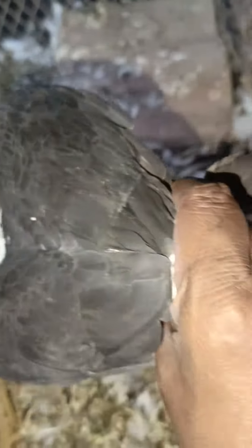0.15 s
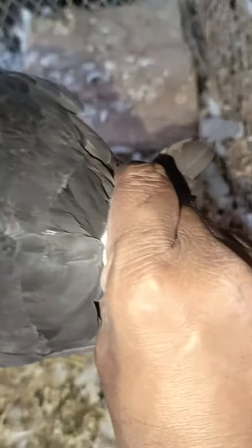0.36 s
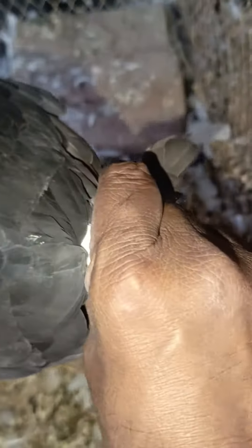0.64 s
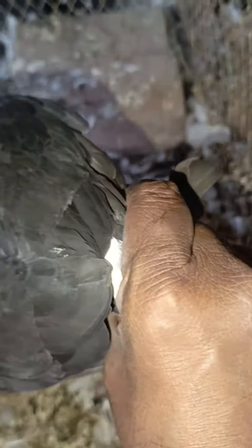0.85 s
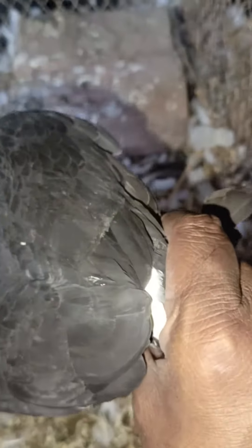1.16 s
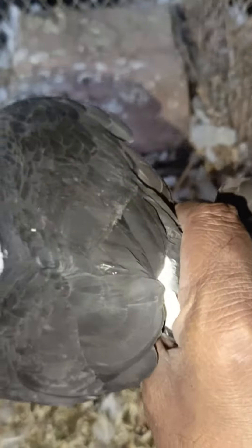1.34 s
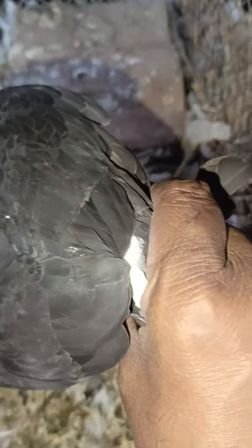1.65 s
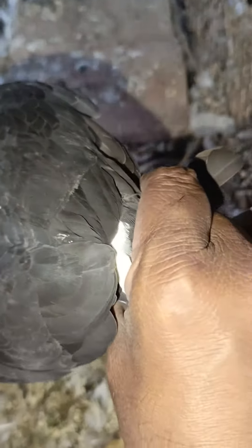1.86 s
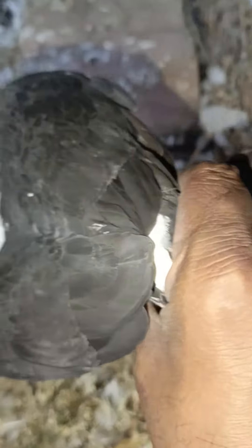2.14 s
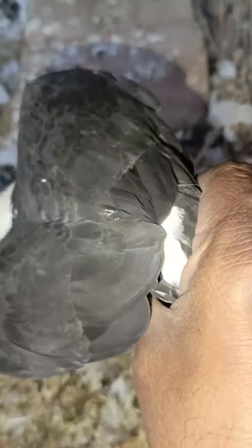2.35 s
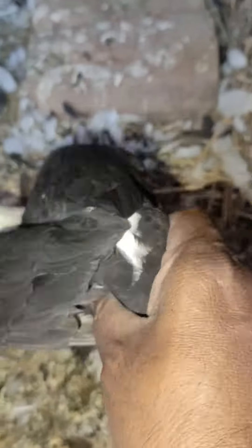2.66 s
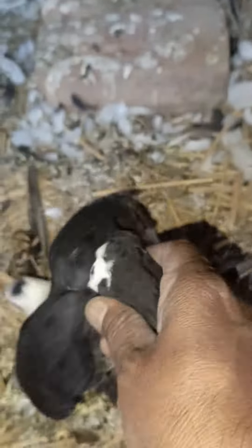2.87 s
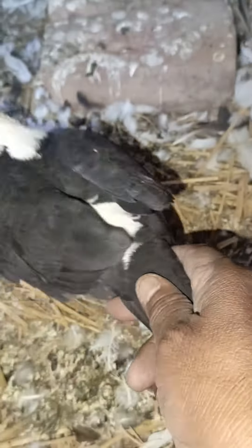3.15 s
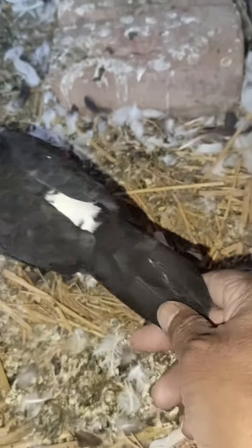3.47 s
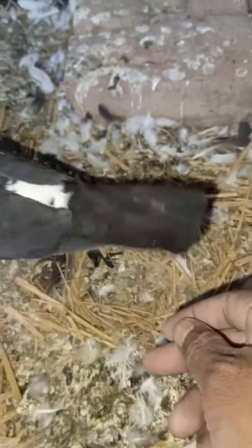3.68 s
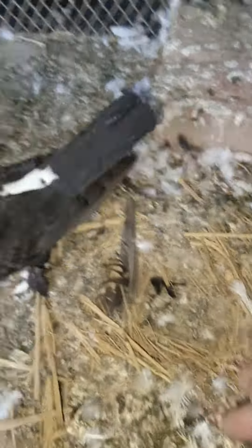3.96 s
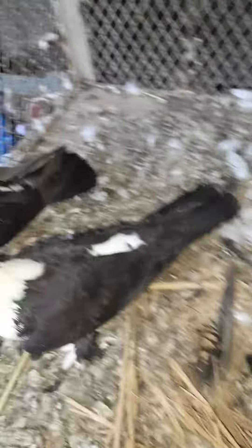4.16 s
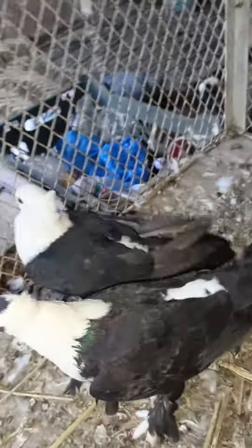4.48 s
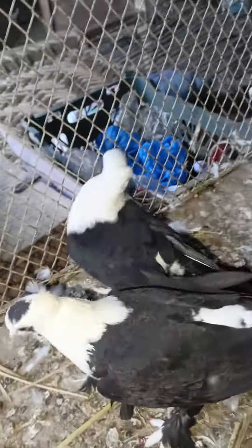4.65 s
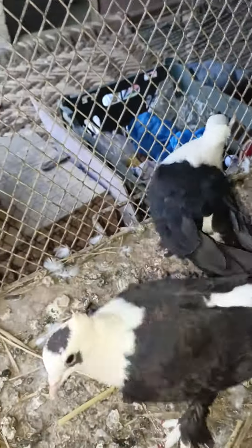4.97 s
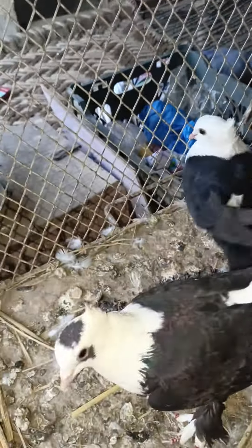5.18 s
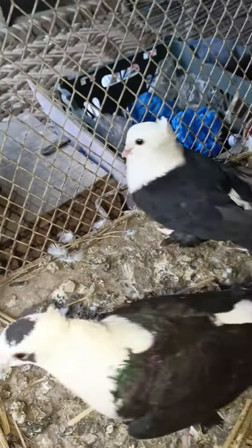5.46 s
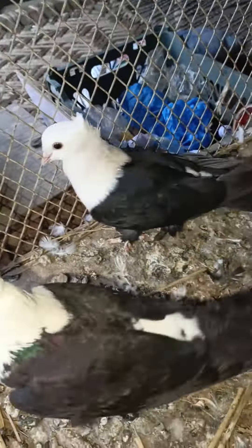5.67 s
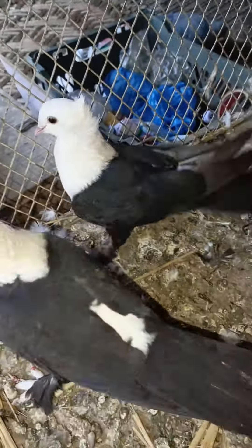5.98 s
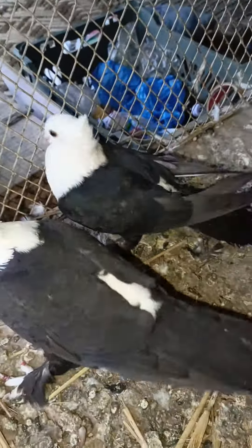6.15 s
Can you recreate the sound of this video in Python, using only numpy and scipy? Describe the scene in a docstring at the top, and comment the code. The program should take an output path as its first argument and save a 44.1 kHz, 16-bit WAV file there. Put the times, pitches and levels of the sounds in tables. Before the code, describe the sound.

Close pigeons in a wire cage: raspy high squeaks come in clusters among low murmuring coos, gritty rustling, sharp clicks and a dull background wash.

```python
"""Wire cage under a shed roof: pigeons close to a phone. Young birds squeak and whistle in hoarse bursts
(shaky harmonic stacks plus air), adults coo (noise through moving resonances), feet and feathers scuffle in
straw and grit (clumped crackles), claws tick and knock (short noise decays). The shed adds a short tail;
a dull wash of far flock, air and street and low draughts on the phone lie underneath."""
import sys
import numpy as np
from scipy import signal
from scipy.fft import rfft, irfft
from scipy.io import wavfile
from scipy.ndimage import uniform_filter1d

SR = 44100
rng = np.random.default_rng(int(sys.argv[2]) if len(sys.argv) > 2 else 0)


def file_out(sig):
    """Save sig as 16-bit WAV at sys.argv[1]."""
    # one column per channel
    cols = np.atleast_2d(sig).T
    # limit, then scale
    lim = np.clip(cols, -1, 1)
    pcm = np.round(lim * 32767).astype(np.int16)
    wavfile.write(sys.argv[1], SR, pcm)


def volts_from_db(level):
    """Convert decibel levels to linear amplitude ratios."""
    exponent = np.asarray(level, float) / 20
    return 10 ** exponent


N = 278712

# Adults cooing over each other. Each row: start in seconds, length in seconds, pitch in Hz, level in dB before the fades.
COOS = [(0, 0.1296, 457.2, -28.5), (.04, 0.2474, 306.9, -34.5), (.38, 0.239, 282.7, -43),
        (.5, 0.335, 448.6, -41.5), (.72, 0.37, 331.5, -33.5), (.79, 0.1548, 661.2, -35),
        (1, 0.3955, 358.8, -33), (1.14, 0.1515, 482, -38.5), (1.35, 0.349, 297.7, -34.5),
        (1.46, 0.38, 423.7, -40.5), (1.85, 0.536, 354.2, -38.5), (2.46, 0.416, 356.2, -29),
        (2.89, 0.1933, 448.4, -31), (3.03, 0.206, 355.8, -29.5), (3.58, 0.458, 315.1, -37),
        (3.85, 0.433, 260.2, -34), (3.99, 0.226, 453, -34), (4.25, 0.199, 405, -40),
        (4.44, 0.284, 286.3, -39), (4.78, 0.28, 311.2, -33.5), (5.2, 0.397, 352.4, -35),
        (5.34, 0.342, 261.9, -39.5), (5.64, 0.431, 343.4, -32.5), (5.73, .3, 406.7, -35.5)]
# Bouts of straw, grit and feathers. Each row: start in seconds, length in seconds, start level in dB, end level in dB,
# both before the common SCUFFLE_GAIN_DB.
SCUFFLES = [(0, .22, -48, -42.5), (.22, .12, -45, -64), (.37, .05, -58, -43), (.8, .25, -45, -38),
            (1.05, .26, -54, -68), (1.315, .1, -43, -52), (1.41, .27, -50, -43), (1.68, .12, -44, -54),
            (1.8, .08, -52, -40), (1.88, .4, -45, -54), (2.31, .08, -55, -46), (2.39, .06, -48, -66),
            (2.55, .39, -61, -47), (2.94, .1, -54, -68), (3.72, .15, -57, -62), (4.16, .26, -46, -54),
            (4.44, .3, -46, -52), (4.75, .55, -57, -63), (5.35, .4, -48, -62), (5.755, .2, -48, -56),
            (5.95, .37, -55, -60)]
SCUFFLE_GAIN_DB = 10
# Spectrum of straw and grit. Each row: frequency in Hz, relative density in dB per Hz.
STRAW_SPECTRUM = [(290, -52), (500, 0), (783, -5.5), (1190, -13.5), (1500, -7.5), (2290, 2), (4020, -6),
                  (4510, -5), (11900, -16.5), (14800, -10), (15900, -27)]
# Spectrum of far flock, air and street. Each row: frequency in Hz, relative density in dB per Hz.
YARD_SPECTRUM = [(24, -68.5), (40, -66.5), (123, -7), (320, 1.5), (454, -2), (788, -15.5), (1440, -17),
                 (2430, -14.5), (4780, -28), (11500, -47), (13700, -108.5), (14700, -43.5), (15900, -46)]
YARD_DB = -37.5
# How busily the far flock stirs, above the bass only. Each row: time in seconds, lift in dB.
STIR = [(0, -1), (1.05, 8.5), (1.22, -8), (1.35, 5.5), (2.1, 7.5), (2.3, -4.5), (2.95, 8.5), (3.1, -2.5),
        (3.65, -6.5), (4.3, -3.5), (4.9, -6), (5.2, -7), (5.9, 0.5), (6.32, -1)]
# Wing draughts and handling on the phone. Each row: start in seconds, length in seconds, crest level in dB.
BUFFETS = [(0, .3, -27), (.36, .32, -33), (1.28, .14, -40), (1.46, .38, -32), (2.05, .2, -45),
           (2.62, .25, -46), (4.9, .36, -34), (5.55, .6, -35)]
DRAUGHT_DB = -61  # the air is never quite still
# Spectrum of the draughts. Each row: frequency in Hz, relative level in dB.
DRAUGHT_SPECTRUM = [(20, 11), (70, 1.5), (130, -6), (250, -47.5)]
# Decay of the shed. Each row: frequency in Hz, time to fall 60 dB in seconds.
SHED_DECAY = [(300, 0.133), (2000, 0.434), (5000, 0.2427), (10000, 0.2047)]
# Claws and beaks on grit and brick. Each row: start in seconds, initial crack level in dB, knock relative to crack in dB.
TICKS = [(0.0338, -22, -8.5), (0.1192, -21.5, -4.5), (0.191, -15, -8.5), (0.2782, -23.5, -4),
         (0.3506, -27.5, -4.5), (0.5396, -13, -27.5), (0.5706, -16, -7.5), (1.3284, -22, -9.5),
         (1.6348, -14.5, -6), (1.706, -20, -5), (1.8322, -35, -2.5), (2.5469, -32, -22),
         (2.5687, -27.5, -10), (2.606, -24.5, -14), (2.6537, -27, -6.5), (2.9118, -13, -41.5),
         (3.132, -34.5, 4.5), (5.0178, -31.5, -44), (5.1268, -33.5, -47.5), (5.3874, -30, -31.5),
         (5.6037, -27, -10), (5.6172, -41, -29), (5.6746, -35, -8.5)]
# Spectrum of the knock. Each row: frequency in Hz, relative level in dB.
KNOCK_SPECTRUM = [(80, -63.5), (200, 2.5), (500, -7), (1200, 8), (2500, -39), (6000, -59.5)]
# Throat and beak response. Each row: frequency in Hz, relative level in dB.
BEAK = [(410, -59), (700, -59.5), (885, -18), (1160, -12), (1860, -18.5), (3480, -3.5), (4020, -5.5),
        (4820, 0), (5420, -10.5), (6510, -13), (10700, -28), (15800, -42)]
# Held squeaks. Each row: voice, start in seconds, length in seconds, pitch in Hz, strongest harmonic in dB
# (before contour and break-up), hoarseness 0-1.
SQUEAKS = [ ("reedy", .11, .14, 1560, -35, .5), ("nasal", .4, .13, 1450, -26.5, .2),
           ("clear", .44, .155, 1088, -23.5, .066), ("reedy", .615, .115, 1460, -27, .6),
           ("near", .625, .11, 1140, -24, .29), ("near", .7, .17, 1175, -12, .29),
           ("reedy", .885, .16, 1470, -26, .6), ("near", .9, .15, 1150, -26, .45),
           ("near", 1.873, .15, 1145, -16, .32), ("near", 2.035, .18, 1185, -15.5, .39),
           ("far", 2.71, .14, 2250, -34.5, .75), ("thin", 2.85, .09, 3290, -25, .43),
           ("reedy", 3.15, .14, 1190, -39, .62), ("near", 3.27, .15, 1160, -11, .32),
           ("near", 3.425, .165, 1185, -9, .3), ("far", 3.722, .1, 1930, -40, .45),
           ("low", 3.882, .15, 845, -26.5, .36), ("low", 4.055, .115, 850, -25.5, .36),
           ("reedy", 4.155, .16, 1490, -21, .45), ("near", 4.43, .075, 1150, -25, .34),
           ("reedy", 4.437, .18, 1480, -26, .48), ("sharp", 4.615, .032, 1430, -17, .49),
           ("sharp", 4.665, .04, 1340, -23, .53), ("piping", 4.7, .045, 1830, -36, .45),
           ("piping", 5.04, .07, 1520, -44, .48), ("thin", 5.139, .095, 3540, -33, .4),
           ("piping", 5.33, .19, 1890, -34.5, .3), ("near", 5.746, .18, 1145, -30, .42), ]
# Young birds' voices. Each row: breath in dB, odd harmonics in dB, tilt in dB per octave, scoop as a share of pitch
# (negative starts high), sag as a share of pitch (negative rises), swell in seconds, swell start in dB, fade in dB.
VOICES = { "near": (-5, -2.5, 1, .05, -.03, .04, -8, -24), "clear": (-11, -2, 3.5, -.025, 0, .06, -5, -8),
          "reedy": (-5, -11, .5, .2, .05, .035, -7, -13), "nasal": (-10, -15, 4, .01, .07, .02, -2, -14),
          "sharp": (-10, -5, -2.5, .05, .06, .012, -3, -6), "far": (-7.5, 14, -9, .03, -.02, .06, -4, -2),
          "piping": (-16, 15, -3, .07, .01, .03, -10, -5), "low": (-9.5, -3, -9, .03, .02, .035, -4, -9),
          "thin": (-12, -2, 6.5, .08, -.01, .015, -1, -20), }
SCOOP_S = .015  # time constant of finding the pitch
# Effort in dB above EASY_DB adds tilt; positive effort also thins the breath.
EASY_DB, BRIGHTEN_DB_PER_OCTAVE_PER_DB, CLEAR_UP_DB_PER_DB = -20, .3, .6
# Hard near squeaks bring in the other side of the syrinx, dropping from a high start to a held note.
HARD_DB = -19
SHRILL_LATE_S, SHRILL_S, SHRILL_DROP_S = .018, .072, .012
SHRILL_START_HZ, SHRILL_HZ = 3850, 3260
SHRILL_DB, SHRILL_FADE_DB = -17, -18
# Shrill voice. Its one row: hoarseness 0-1, breath in dB, odd harmonics in dB, tilt in dB per octave.
SHRILL_VOICE = (.35, -6, 0, 9)
# Sliding whistles. Each row: manner, start in seconds, length in seconds, top pitch in Hz, end pitch in Hz,
# strongest harmonic in dB (before contour and break-up).
WHISTLES = [ ("drop", 1.12, .06, 3410, 2300, -36), ("wail", 2.14, .135, 2680, 1420, -23.5),
            ("hook", 2.805, .045, 2750, 2570, -28), ("swell", 3.1, .18, 3050, 2560, -49),
            ("arch", 3.915, .15, 1240, 870, -14.5), ("climb", 4.2, .085, 1290, 1280, -22),
            ("wail", 4.295, .055, 2850, 2200, -24), ("wail", 4.51, .048, 2750, 2050, -30),
            ("hook", 4.634, .042, 3440, 2750, -20), ("drop", 4.74, .11, 3500, 1580, -35),
            ("drop", 5.137, .07, 4900, 2050, -31), ]
# Whistle manners. Each row: hoarseness 0-1, breath in dB, odd harmonics in dB, tilt in dB per octave,
# scoop as a share of pitch, share of time rising 0-1, exponent of the fall, level change to the end in dB.
MANNERS = { "arch": (.3, -8, -24, -10.5, .27, .22, 2.2, -5), "wail": (.36, -14, -1, -5.5, .05, .27, .95, 8),
           "climb": (.37, -3, -14, -3, .1, .95, 1.1, 1.5), "hook": (.25, -12, -6, 0, .15, .3, 3.5, 4),
           "swell": (.64, -25, 14, -2, .01, .02, 2.6, 25), "drop": (.5, -12, 10, -8, .01, .02, .7, -7), }
# Microphone port response. Each row: frequency in Hz, gain in dB.
PORT = [(30, -33.5), (110, 2), (7000, -0.5), (7900, -7), (13700, -5.5), (14500, 2.5), (15900, -2.5)]


def evened(x):
    """Scales to rms 1."""
    return x / np.sqrt(np.mean(x ** 2) + 1e-20)


def read(points, hz):
    """Spectrum at any frequency, straight on a log axis."""
    f, value = np.transpose(points)
    return np.interp(np.log(hz + 1), np.log(f + 1), value)


def add(mix, start_s, sound):
    """Adds a sound into the mix in place."""
    part = mix[max(round(start_s * SR), 0):][:len(sound)]
    part += sound[:len(part)]


def colour(x, points):
    """Filters by a spectrum, then scales to rms 1."""
    gain = volts_from_db(read(points, np.fft.rfftfreq(len(x), 1 / SR)))
    return evened(irfft(rfft(x) * gain, len(x)))


def wander(count, hz, channels=1):
    """Low-passed random drift up to about hz, rms 1."""
    noise = rng.standard_normal((channels, count))
    drift = signal.lfilter([1], [1, -np.exp(-2 * np.pi * hz / SR)], noise)
    return evened(drift.squeeze())


def resonate(x, hz, width_hz):
    """Moving resonance: shifts the curve hz to zero, smooths, shifts back."""
    turn = np.exp(2j * np.pi * np.cumsum(hz) / SR)
    r = np.exp(-np.pi * width_hz / SR)
    return 2 * (turn * signal.lfilter([1 - r], [1, -r], x / turn)).real


def coo():
    """A swollen crop hums: noise through two narrow resonances wavers and throbs on an arching, sagging pitch."""
    out = np.zeros(N)
    for start_s, length_s, hz, db in COOS:
        u = np.linspace(0, 1, round(length_s * SR))
        pitch_hz = hz * (1 + 0.0455 * np.sin(np.pi * u) - 0.0455 * u)
        hum = resonate(rng.standard_normal(len(u)), pitch_hz, width_hz=46.2)
        hum = resonate(hum, pitch_hz, width_hz=74.7)
        add(out, start_s, volts_from_db(db) * evened(hum) * signal.windows.tukey(len(u), .45))
    return out


def scuffle():
    """Straw crackles in clumped snaps with 10 ms decays, over a soft brush of feathers."""
    t = np.arange(N) / SR
    level = np.zeros(N)
    for start_s, length_s, start_db, end_db in SCUFFLES:
        level += volts_from_db(np.interp(t, [start_s, start_s + length_s], [start_db, end_db], -120, -120))
    clumps = volts_from_db(4.8 * uniform_filter1d(wander(N, hz=24.84), size=200))
    heights = volts_from_db(4.5 * np.minimum(rng.exponential(1, N), 4))
    snaps = heights * (rng.random(N) < 150 * clumps / SR)  # 150 a second times clumps
    bursts = signal.lfilter([1], [1, -np.exp(-1 / (0.01 * SR))], snaps)
    brush = volts_from_db(-11) * np.sqrt(clumps)
    mix = (evened(bursts) + brush) * rng.standard_normal(N)
    return volts_from_db(SCUFFLE_GAIN_DB) * uniform_filter1d(level, size=300) * colour(mix, STRAW_SPECTRUM)


def yard():
    """Far flock, air and street: shaped noise whose level drifts in patches of pitch and time."""
    frames, hz = N // 256 + 5, np.fft.rfftfreq(1024, 1 / SR)
    real, imag, patches = rng.standard_normal((frames, 513, 3)).T
    patches = uniform_filter1d(patches, size=40, axis=0)
    patches = evened(uniform_filter1d(patches, size=24, axis=1))
    stir_db = np.interp(np.arange(frames) * 256 / SR, *np.transpose(STIR))
    stir_db = np.outer(hz > 600, stir_db)
    z = (real + 1j * imag) * volts_from_db(read(YARD_SPECTRUM, hz)[:, None] + 2.51 * patches + stir_db)
    wash = signal.istft(z, nperseg=1024, noverlap=768)[1][:N]
    return volts_from_db(YARD_DB) * evened(wash)


def buffet():
    """Lumpy low air pressure on the diaphragm, each draught swelling and dying."""
    level = np.full(N, volts_from_db(DRAUGHT_DB))
    for start_s, length_s, db in BUFFETS:
        add(level, start_s, volts_from_db(db) * np.hanning(round(length_s * SR)))
    lumps = volts_from_db(4 * uniform_filter1d(wander(N, hz=9.6), size=800)) * rng.standard_normal(N)
    return level * colour(lumps, DRAUGHT_SPECTRUM)


def shed(x):
    """Sparse echoes of random sign, each band dying at its own speed."""
    taps = np.zeros(SR // 2)
    at = np.arange(200, SR // 2 - 20, 20)  # one echo per 20 samples
    taps[at + rng.integers(0, 20, len(at))] = rng.choice([-1., 1.], len(at))
    hz, t, z = signal.stft(taps, SR, nperseg=256)
    decay = volts_from_db(-60 * t / read(SHED_DECAY, hz)[:, None])
    tail = signal.istft(z * decay, SR, nperseg=256)[1]
    return signal.fftconvolve(x, tail / np.linalg.norm(tail))[:N]


def ticks():
    """A short crack of grit over a duller, longer knock, both decaying noise."""
    out, t = np.zeros(N), np.arange(1500) / SR
    grit = colour(rng.standard_normal(N), STRAW_SPECTRUM)
    wood = colour(rng.standard_normal(N), KNOCK_SPECTRUM)
    for start_s, db, knock_db in TICKS:
        at = slice(round(start_s * SR), round(start_s * SR) + len(t))
        crack = grit[at] * volts_from_db(-60 * t / .02)  # 60 dB in 20 ms
        knock = volts_from_db(knock_db) * wood[at] * volts_from_db(-60 * t / .03)
        add(out, start_s, volts_from_db(db) * (crack + knock) * np.minimum(1, t / 0.001087))
    return out


def breath():
    """Air through the beak: noise in ragged patches of pitch and time."""
    _, _, z = signal.stft(rng.standard_normal(N), SR, nperseg=256)
    patches = uniform_filter1d(rng.standard_normal(z.shape), size=4, axis=0)
    patches = evened(uniform_filter1d(patches, size=5, axis=1))
    air = signal.istft(z * volts_from_db(4 * patches), SR, nperseg=256)[1][:N]
    return colour(air, BEAK)


def squeak(hoarse, breath_db, odd_db, tilt_db, rows, air):
    """A small syrinx: a shaky harmonic stack and a rush of air, through throat and beak."""
    s, *columns = np.transpose(rows)
    t = np.arange(s[0], s[-1], 1 / SR)
    hz, db = (np.interp(t, s, c) for c in columns)
    hoarse = np.clip(hoarse, 0, 1)
    # the membranes slip in pitch, fast and slow
    slip = 0.0602 * wander(len(t), hz=143.6)
    slip += 0.03987 * uniform_filter1d(wander(len(t), hz=29.33), size=150)
    turns = np.cumsum(hz * (1 + hoarse * slip)) / SR
    k = np.arange(1, 19)[:, None]  # harmonic number
    heights = volts_from_db(read(BEAK, k * hz) + odd_db * (k % 2) + tilt_db * np.log2(k))
    heights = heights * (k * hz < SR / 2.7)
    # each harmonic breaks up by itself
    breaks = uniform_filter1d(wander(len(t), hz=45, channels=len(k)), size=150)
    heights = heights / heights.max(0) * volts_from_db(14 * hoarse * np.minimum(breaks, 1))
    waves = np.cos(2 * np.pi * (k * turns + rng.random(k.shape)))
    stack = (heights * waves).sum(0) * np.sqrt(2)
    flutter = np.tanh(1 + 1.157 * hoarse * wander(len(t), hz=87.5))  # the whole stack falters
    fade = np.minimum(1, np.minimum((t - t[0]) / .011, (t[-1] - t) / .018))
    rush = volts_from_db(breath_db) * air[round(s[0] * SR):][:len(t)]
    return s[0], volts_from_db(db) * fade * (stack * flutter + rush)


def held(voice, start_s, length_s, hz, db, hoarse):
    """Scoops to pitch while swelling, then drifts and fades; harder squeaks are brighter and less breathy."""
    breath_db, odd_db, tilt_db, scoop, sag, swell_s, swell_db, fade_db = VOICES[voice]
    t = np.linspace(0, length_s, 24)
    pitch_hz = hz * (1 - scoop * np.exp(-t / SCOOP_S) - sag * t / length_s)
    swell_s = min(swell_s, length_s / 2)
    swell = np.maximum(1 - t / swell_s, 0)
    fade = np.maximum((t - swell_s) / (length_s - swell_s), 0) ** 1.5
    level_db = db + swell_db * swell + fade_db * fade
    effort_db = db - EASY_DB
    breath_db = breath_db - CLEAR_UP_DB_PER_DB * max(effort_db, 0)
    tilt_db = tilt_db + BRIGHTEN_DB_PER_OCTAVE_PER_DB * effort_db
    return hoarse, breath_db, odd_db, tilt_db, np.transpose([start_s + t, pitch_hz, level_db])


def shrill(start_s):
    """Second side of the syrinx in a hard squeak: drops to a held note and fades."""
    t = np.linspace(0, SHRILL_S, 16)
    drop = np.exp(-(t / SHRILL_DROP_S) ** 2 / 2)
    pitch_hz = SHRILL_HZ + (SHRILL_START_HZ - SHRILL_HZ) * drop
    level_db = SHRILL_DB + SHRILL_FADE_DB * (t / SHRILL_S) ** 2
    return *SHRILL_VOICE, np.transpose([start_s + SHRILL_LATE_S + t, pitch_hz, level_db])


def whistle(manner, start_s, length_s, top_hz, end_hz, db):
    """A syrinx glide: climbs to its top, then slides down."""
    *voice, scoop, rising, bend, fade_db = MANNERS[manner]
    u = np.linspace(0, 1, 24)
    climb = np.maximum(1 - u / rising, 0)
    fall = np.maximum((u - rising) / (1 - rising), 0)
    pitch_hz = top_hz * (1 - scoop * climb ** 2) - (top_hz - end_hz) * fall ** bend
    return *voice, np.transpose([start_s + u * length_s, pitch_hz, db + fade_db * u])


def scene():
    """Young birds, ticks and coos ring in the shed; scuffle, yard and buffet get no added tail."""
    young, air = np.zeros(N), breath()
    calls = [held(*row) for row in SQUEAKS] + [whistle(*row) for row in WHISTLES]
    calls += [shrill(s) for voice, s, _, _, db, _ in SQUEAKS if voice == "near" and db > HARD_DB]
    for call in calls:
        add(young, *squeak(*call, air))
    hits, adults = ticks(), coo()
    wet = shed(volts_from_db(-4.5) * young + volts_from_db(-5) * hits + volts_from_db(-7.5) * adults)
    return (young + hits + adults + wet + scuffle() + yard() + buffet())[None]


def low_pass(x):
    """Removes everything above the highest recorded frequency."""
    return signal.sosfilt(signal.butter(12, 16920, fs=SR, output="sos"), x)


def record(dry):
    """Port colour, gain control that ducks at loud sounds and recovers slowly, rounded peaks."""
    x = irfft(rfft(dry) * volts_from_db(read(PORT, np.fft.rfftfreq(N, 1 / SR))), N)
    power_db = 10 * np.log10(abs(uniform_filter1d(x[0] ** 2, size=900)) + 1e-12)
    fall_db = np.arange(N) * 26.7 / SR  # recovery in dB a second
    held_db = np.maximum.accumulate(power_db + fall_db) - fall_db
    over_db = np.maximum(held_db + 17.5, 0)  # threshold -17.5 dB
    ducked = x / volts_from_db(0.316 * uniform_filter1d(over_db, size=400))
    soft = .85 * np.tanh(ducked / .85)
    return low_pass(soft)


dry = scene()
out = record(dry)
file_out(out)
```